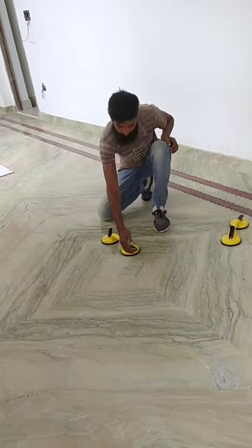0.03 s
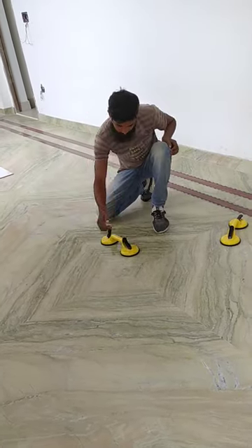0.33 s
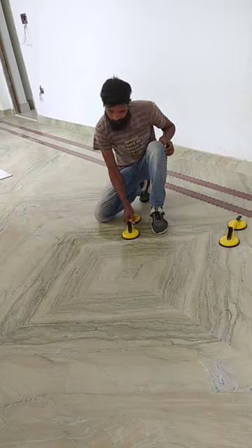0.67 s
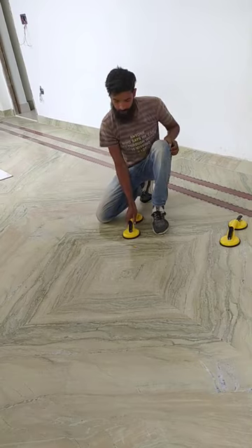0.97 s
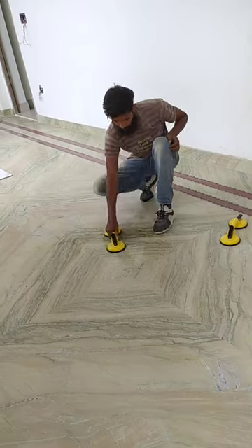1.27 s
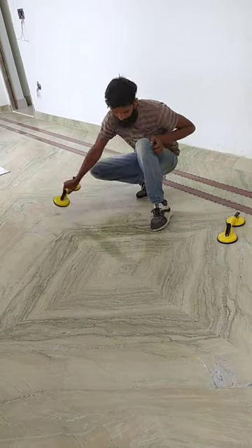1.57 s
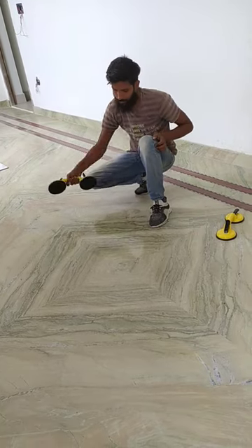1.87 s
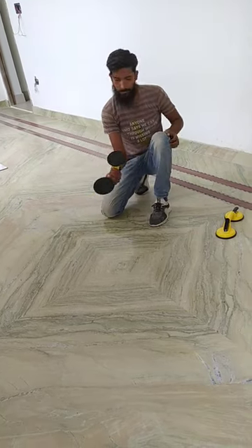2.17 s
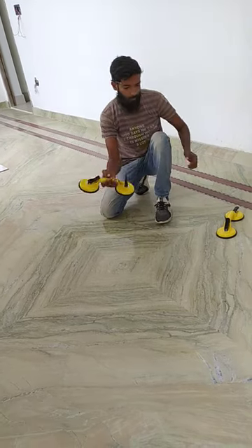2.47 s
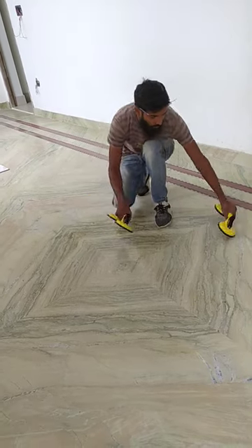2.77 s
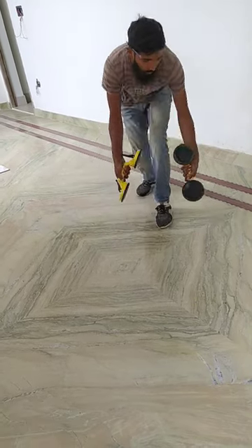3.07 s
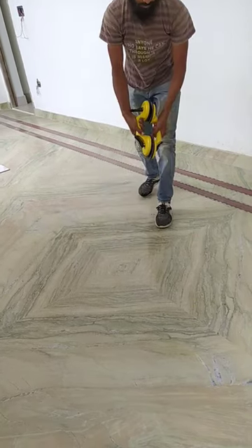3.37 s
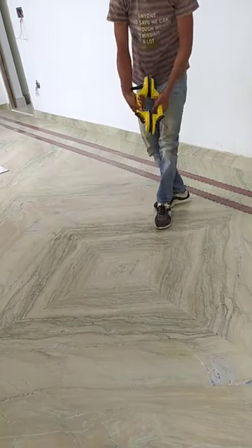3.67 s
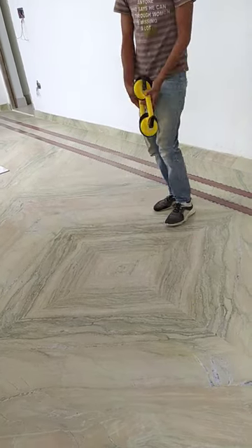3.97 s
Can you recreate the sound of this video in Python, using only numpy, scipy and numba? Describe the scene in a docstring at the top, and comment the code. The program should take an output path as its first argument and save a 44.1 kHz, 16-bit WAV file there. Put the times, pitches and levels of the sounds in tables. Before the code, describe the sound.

Sharp echoing pop of suction lifters releasing, faint rustling, then a hollow, rattling clack.

```python
"""Two-cup suction lifters let go of a stone floor in a bare, echoing room, a few metres from a phone.
Two release levers snap open: the first just before the start, so we hear its echo, the second with a
gulp of air and an echo that briefly swells. The lifters are picked up with soft bumps, scuffs and
rustling clothes, then clapped together. The room rings after each blow, over a steady murmur of air,
and the phone's limiter turns the loudest moments down."""
import sys
import numpy as np
from scipy import signal
from scipy.fft import rfft, irfft
from scipy.io import wavfile
from scipy.ndimage import uniform_filter1d
from numba import njit

SR = 44100
rng = np.random.default_rng(int(sys.argv[2]) if len(sys.argv) > 2 else 0)


def dump(signal):
    """Clip the signal to [-1, 1] and save it as 16-bit WAV at the path in sys.argv[1]."""
    limited = np.clip(np.atleast_2d(signal).T, -1, 1)
    pcm = np.round(limited * 32767).astype(np.int16)
    wavfile.write(sys.argv[1], SR, pcm)


N = 176400
T = np.arange(N) / SR
HZ = np.maximum(np.fft.rfftfreq(N, 1 / SR), 1)
ATTACK_S, ROOM_BUILD_S = 0.006, 0.0057  # how long a burst and its echo take to build up
FINE_RIPPLE, HOLLOW_RIPPLE = dict(depth_db=3, spacing_hz=30.24), dict(depth_db=2.2, spacing_hz=170)


def undb(db):
    """Turn decibels into a number to multiply by."""
    return 10 ** (np.asarray(db) / 20)


def over_hz(points):
    """Join (frequency, value) points into a curve over all frequencies."""
    hz, value = np.array(points, float).T
    return np.interp(np.log(HZ), np.log(hz), value)


def smooth_random(count, span):
    """Random values, smoothed over `span` neighbours, with a typical size of 1."""
    curve = uniform_filter1d(uniform_filter1d(rng.standard_normal(count), span), span)
    return curve / curve.std()


def wobble(rate_hz):
    """A random drift up and down; a higher rate moves faster."""
    return smooth_random(N, int(SR / rate_hz))


def ripple(depth_db, spacing_hz):
    """Crowded resonances of the lifters and the room: small peaks and dips, weaker in the bass."""
    peaks = np.minimum(smooth_random(len(HZ), int(spacing_hz * N / SR)), np.sqrt(2))
    return undb(depth_db * peaks * np.minimum(HZ / 1500, 1))


def swell(start, rise_s):
    """The time since a sound began, and its fade-in from 0 to 1."""
    age = np.maximum(T - start, 0)
    return age, 1 - np.exp(-age / rise_s)


def die_away(age, ring_s):
    """A fade that drops 60 dB in the ring time."""
    return np.exp(-np.log(1000) * age / ring_s)


def hump(centre_s, half_length_s):
    """A smooth rise and fall."""
    return np.exp(-((T - centre_s) / half_length_s) ** 2)


# how alike left and right are: f/Hz, likeness (0 unrelated, 1 the same)
STEREO_LIKENESS = [(50, 1), (130, 1), (250, 1), (550, 0.54), (1100, 0.047), (4000, 0.012), (12000, 0.024)]
# how much louder the left is than the right: f/Hz, level/dB
STEREO_BALANCE = [(50, -3), (130, -4), (250, -2.6), (550, -2.8), (1100, .4), (4000, .2), (9000, -.7),
                  (14000, .5)]
DIRECT_LIKENESS = 0.15  # for sound that comes straight from the source


def noise(colour, likeness=None):
    """Stereo noise of a set strength; its colour says only how bass and treble compare."""
    alike = np.clip(over_hz(STEREO_LIKENESS) if likeness is None else likeness, -.95, .95)
    middle, side = rfft(rng.standard_normal((2, N))) * colour
    left_right = np.array([[1], [-1]])
    spectrum = middle + left_right * side * np.sqrt((1 - alike) / (1 + alike))
    sound = irfft(spectrum * undb(left_right * over_hz(STEREO_BALANCE) / 2), N)
    return sound / sound.mean(0).std()


# how long the room rings: f/Hz, ring time/s
ROOM_RING_TIMES = [(100, 1.23), (300, 1.205), (800, 1.16), (1800, 0.9), (4000, 0.83), (7000, .64),
                   (10000, 0.58), (15000, 0.23)]


def echo(colour, start):
    """Many reflections build up, flutter and die away, the treble first."""
    age, onset = swell(start, ROOM_BUILD_S)
    reflections, out = rfft(noise(colour)), 0
    for band_hz, ring_s in ROOM_RING_TIMES:
        band = over_hz([(hz, hz == band_hz) for hz, _ in ROOM_RING_TIMES])
        out = out + irfft(reflections * band, N) * die_away(age, ring_s)
    return out * onset * undb(wobble(rate_hz=139))


def blow(colour_table, start, direct_db, room_db, decay_s, rise_s=ATTACK_S):
    """One knock: a short crackling burst and the room's answer."""
    colour = undb(over_hz(colour_table))
    age, onset = swell(start, rise_s)
    crackle = noise(colour, DIRECT_LIKENESS) * undb(wobble(rate_hz=950))
    burst = crackle * onset * np.exp(-age / decay_s)
    room = echo(colour * ripple(**FINE_RIPPLE) * ripple(**HOLLOW_RIPPLE), start)
    return undb(direct_db) * burst + undb(room_db) * room


def hollow_tones(table, start):
    """A struck or freed cup rings: its tones waver and fade, a little out of step left and right."""
    waver_db, waver_hz, drift_radians = 4, 21, 0.86
    age, onset = swell(start, rise_s=0.0045)
    out = 0
    for hz, db, ring_s in table:
        phase = rng.uniform(0, 2 * np.pi) + drift_radians * np.array([wobble(waver_hz) for _ in "LR"])
        level = undb(db + waver_db * wobble(waver_hz)) * die_away(age, ring_s)
        out = out + level * np.sin(2 * np.pi * hz * age + phase)
    return out * onset


# the two snaps: t/s, direct level/dB, echo level/dB, decay/s, change to the ringing level/dB
LEVER_SNAPS = [(-.06, -9, -14, 0.014, -3.5), (0.2743, -9.5, -6.5, 0.01, -0.5)]
# the bright tone heard at each snap: f/Hz, level/dB
# (the gap near 11-12 kHz and the bump near 14 kHz, milder in the first, do not come from the levers)
FIRST_SNAP_AS_HEARD = [(59, -42), (100, -31.5), (152, -9.5), (222, -8.5), (257, -13.5), (297, -7.5),
                       (492, -12), (718, -9.5), (904, -17.5), (1090, -7.5), (1400, -6), (1660, -17),
                       (2800, -14), (3050, -15.5), (3390, -11), (4180, -11.5), (4730, -18), (6090, -8.5),
                       (8880, -2), (10500, -5), (11700, -15), (14100, -12), (15000, -40)]
SECOND_SNAP_AS_HEARD = [(59, -67), (100, -34), (200, -19), (227, -15), (257, -5.5), (291, -4), (407, -28.5),
                        (607, -11), (764, -19), (1320, -21), (1700, -27), (2420, -12), (2800, -15.5),
                        (2970, -21), (3200, -14), (3680, -18), (4180, -10), (4640, -14.5), (7050, -11),
                        (8600, -5), (9400, 0), (10450, -4), (11000, -48), (14100, -8.5), (15000, -34)]
# the pitches a lifter rings at: f/Hz, width/Hz, level/dB
LIFTER_RINGS = [(290, 120, -35), (1335, 150, -35.5), (2860, 45, -42), (4260, 620, -28.5)]


def levers():
    """Each lever snaps open and sets the lifter ringing a little longer than the room."""
    heard = FIRST_SNAP_AS_HEARD, SECOND_SNAP_AS_HEARD
    out = sum(blow(tone, *snap[:4]) for tone, snap in zip(heard, LEVER_SNAPS))
    for hz, width_hz, db in LIFTER_RINGS:
        ring_s = 1.3 * np.interp(hz, *np.array(ROOM_RING_TIMES).T)
        level = 0
        for start, *_, change_db in LEVER_SNAPS:
            age, onset = swell(start, ROOM_BUILD_S)
            level = level + undb(db + change_db) * onset * die_away(age, ring_s)
        out = out + level * pitched_noise(hz, width_hz)
    return out


def pitched_noise(hz, width_hz):
    """Noise gathered around one pitch, as from a resonance."""
    return noise(1 / (1 + ((HZ - hz) / (width_hz / 2)) ** 2))


# the colour of the building's air: f/Hz, level/dB
AIR_COLOUR = [(12, -47), (20, -1.5), (59, 0.5), (89, -7), (118, -12), (143, -5.5), (205, -3.5), (235, -4.5),
              (270, -6), (302, -2.5), (337, -13), (387, -3.5), (457, -10.5), (540, -13), (796, -10.5),
              (994, -13.5), (1640, -17), (1780, -18.5), (2690, -18.5), (3360, -22), (4690, -27.5),
              (5090, -29), (6360, -34), (9370, -28), (15000, -56.5)]


def building_air():
    """The building's steady murmur of air, with a faint far whine that comes and goes."""
    whine = pitched_noise(hz=3440, width_hz=280) * hump(2.6, .8) * undb(-61 + 2.5 * wobble(rate_hz=11))
    murmur = noise(undb(over_hz(AIR_COLOUR))) * undb(-47.5 + .5 * wobble(rate_hz=16))
    return murmur + whine


# the colour of air rushing under the cup: f/Hz, level/dB
GULP_COLOUR = [(30, 6), (100, -8.5), (250, 4), (700, -2), (1300, 0.5), (2600, -5.5), (4000, -13.5),
               (8000, -41), (15000, -74)]
# low hollow tones of the freed cup: f/Hz, level/dB, ring time/s
FREED_CUP_TONES = [(288.4, -35.5, 1.85), (347, -33.5, 1.2)]


def gulp():
    """The seal breaks: air rushes past the flapping lip, the pressure dips and rebounds, the cup rings."""
    start, length_s, dip_at = .2855, 0.024, .301
    colour = undb(over_hz(GULP_COLOUR))
    opening = swell(start, ATTACK_S)[1] - swell(start + length_s, ATTACK_S)[1]
    rush = undb(-7) * noise(colour, DIRECT_LIKENESS) * opening
    flaps = lip_flaps(colour, start)
    room = undb(-26.5) * echo(colour, start)
    dip = undb(-16) * hump(dip_at, 0.004)
    rebound = undb(-17) * hump(dip_at + 0.056, 0.034)
    return rush + flaps + room - dip + rebound + hollow_tones(FREED_CUP_TONES, dip_at)


def lip_flaps(colour, start):
    """Passing air flaps the rubber lip four times, unevenly, each flap a sharp puff."""
    flap_hz, unevenness, puff_s = 171.7, 0.069, 0.00043
    gaps = (1 + unevenness * rng.standard_normal(size=4)) / flap_hz
    times = start + np.cumsum(gaps) - .5 / flap_hz
    puffs = sum((T > at) * np.exp(-np.maximum(T - at, 0) / puff_s) for at in times)
    bass_cut = np.minimum(HZ / flap_hz, 1)
    flaps = irfft(rfft(puffs) * colour * bass_cut, N)
    return -flaps / np.abs(flaps).max()


def snap_echo_swell():
    """The second snap's bright echo swells back up briefly."""
    bright_echo = noise(undb(over_hz(SECOND_SNAP_AS_HEARD)) * ripple(**HOLLOW_RIPPLE))
    return bright_echo * hump(.395, .04) * undb(-20.5 + 2.5 * wobble(rate_hz=160))


# soft bumps of the handle: t/s, direct level/dB, echo level/dB, decay/s
HANDLE_BUMPS = [(0.577, -32, -45.5, .018), (0.809, -43, -47, 0.0094), (0.924, -40, -58, 0.013),
                (2.042, -26, -51, 0.0048)]
# scuffs of rubber and cloth: t/s, level/dB, half length/s
SCUFFS = [(1.107, -53.5, 0.05), (1.298, -49, 0.033), (1.444, -56, 0.21), (1.565, -63.5, 0.089),
          (2.146, -58.5, 0.14), (2.325, -61, 0.019), (2.518, -58, 0.061), (2.813, -62, 0.17),
          (3.002, -60.5, 0.035)]
# the colours of the bumps, the scuffs, and the clothes' dull shuffle and drier rustle: f/Hz, level/dB
BUMP_COLOUR = [(100, -5), (300, 7.5), (1300, -2.5), (1900, -14), (8000, -43)]
SCUFF_COLOUR = [(1500, -7.5), (4000, -11), (7000, -11), (8800, -3), (10000, -3.5), (11200, -12),
                (15000, -17.5)]
SHUFFLE_COLOUR = [(100, -15), (350, 12), (800, 6), (1400, 4), (2500, -11), (6000, -38)]
RUSTLE_COLOUR = [(200, -2), (900, 4), (3000, 5.5), (5000, -4.5), (6500, -2), (8000, -22), (15000, -37)]


def picking_up():
    """The lifters bump and scuff as they are picked up; clothes rub as the body turns and rises."""
    grain = undb(2 * wobble(rate_hz=250) + 2 * wobble(rate_hz=30))
    scuff_level = sum(undb(db) * hump(centre, half_length) for centre, db, half_length in SCUFFS)
    scuffs = scuff_level * noise(undb(over_hz(SCUFF_COLOUR)))
    rustle = undb(-56) * hump(2.68, 0.3) * noise(undb(over_hz(RUSTLE_COLOUR)))
    shuffle = undb(-55) * hump(2.2, 0.2) * noise(undb(over_hz(SHUFFLE_COLOUR)))
    bumps = sum(blow(BUMP_COLOUR, *bump) for bump in HANDLE_BUMPS)
    return bumps + grain * (scuffs + rustle) + shuffle


# the frames touch, clack, then rattle as they settle: t/s, direct level/dB, echo level/dB, decay/s, rise/s
FRAME_CLACKS = [(3.432, -31, -39, 0.0076, 0.001), (3.4435, -21.5, -21, 0.0065, 0.001),
                (3.451, -11.5, -18.5, 0.01, 0.00088), (3.501, -22, -39, 0.0037, .0006),
                (3.5216, -17, -35.5, 0.006, 0.0011), (3.555, -18, -46, 0.0057, .0006)]
# air squeezed from between the rubber cups: t/s, direct level/dB, echo level/dB, decay/s, rise/s
CUP_POPS = [(3.434, -17, -54, 0.028, 0.0095), (3.4522, 6, -25, 0.0034, 0.0054)]
# the colours of the clacks and the pops: f/Hz, level/dB
CLACK_COLOUR = [(59, -68), (100, -42), (176, -16), (208, -17.5), (360, -1.5), (502, -8), (674, -17),
                (735, -12), (825, 3), (983, -6), (1320, -5.5), (1530, -7.5), (1770, -7), (1960, -11.5),
                (2270, -4), (3050, -9), (3530, -11), (4730, -10), (5600, -11), (6400, -15), (9260, 1),
                (11000, -13), (12400, -15.5), (15000, -48)]
POP_COLOUR = [(100, -32.5), (280, -31), (390, -16), (600, -14.5), (735, -3.5), (805, -4), (865, -6),
              (970, -11.5), (1130, -8.5), (1700, -27.5), (5000, -42)]
# hollow tones of the cups clapped together: f/Hz, level/dB, ring time/s
CLAPPED_CUP_TONES = [(375, -38.5, 0.93), (425, -31.5, 0.63), (737, -32, 0.89), (763, -28.5, 1),
                     (805, -30, 1.2), (850, -39, 2), (893, -39.5, 1.8), (1073, -31, 1.2), (1144, -39, 0.67)]


def clap():
    """The frames clack together; the cups pop against each other and ring on from the last pop."""
    clacks = sum(blow(CLACK_COLOUR, *clack) for clack in FRAME_CLACKS)
    pops = sum(blow(POP_COLOUR, *pop) for pop in CUP_POPS)
    return clacks + pops + hollow_tones(CLAPPED_CUP_TONES, start=CUP_POPS[-1][0])


def scene():
    """Everything heard in the room, added together."""
    return levers() + gulp() + snap_echo_swell() + clap() + picking_up() + building_air()


def record(dry):
    """The phone's limiter sees loud sound coming and turns it down; peaks and the top treble are cut."""
    limit_db, ratio, response_s, look_ahead_s = -13.5, 50, 0.0078, .003
    without_rumble = signal.sosfilt(signal.butter(2, 60, "high", fs=SR, output="sos"), dry)
    level = np.sqrt(np.abs(uniform_filter1d((without_rumble ** 2).mean(0), size=128)))
    step = 1 / (response_s * SR)
    smoothed = signal.lfilter([step], [1, step - 1], level)
    coming = np.interp(T + look_ahead_s, T, smoothed)
    gain = np.maximum(coming / undb(limit_db), 1) ** (1 / ratio - 1)
    treble_cut = signal.ellip(8, .2, 70, 15300, fs=SR, output="sos")
    return signal.sosfilt(treble_cut, np.clip(dry * gain, -.88, .88))


dry = scene()
out = record(dry)
dump(out)
```